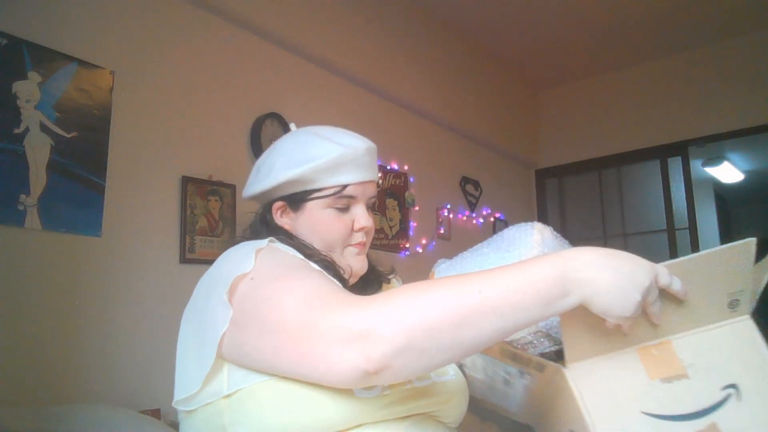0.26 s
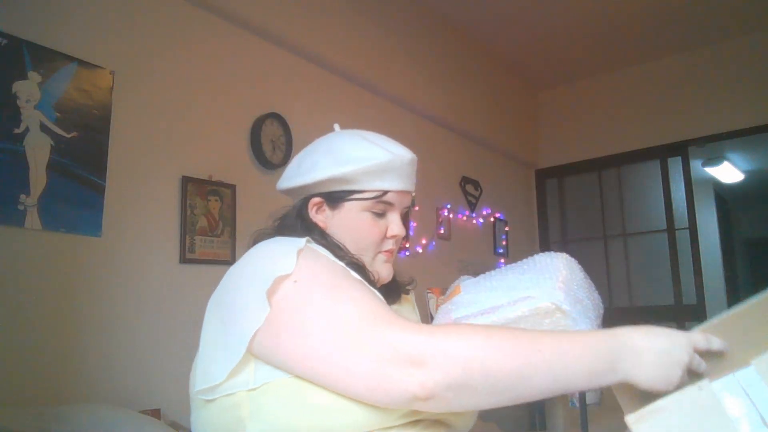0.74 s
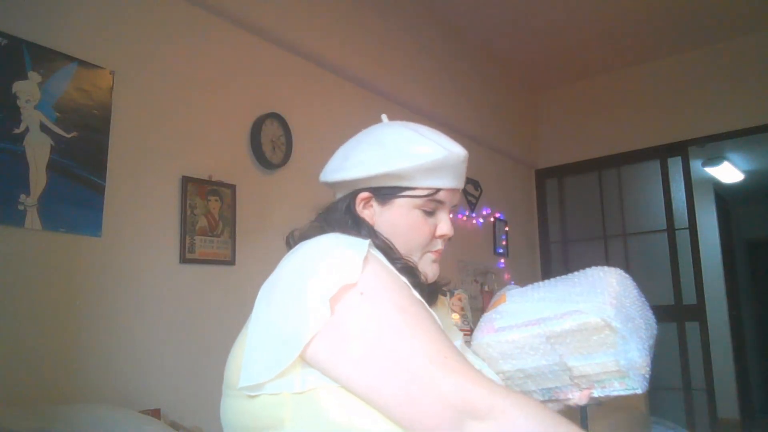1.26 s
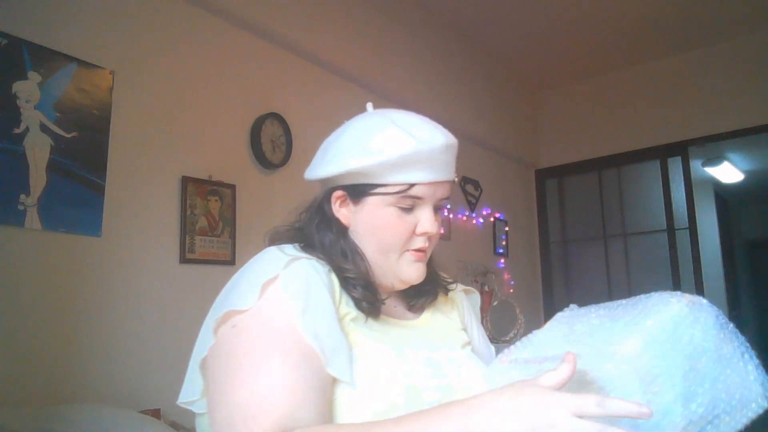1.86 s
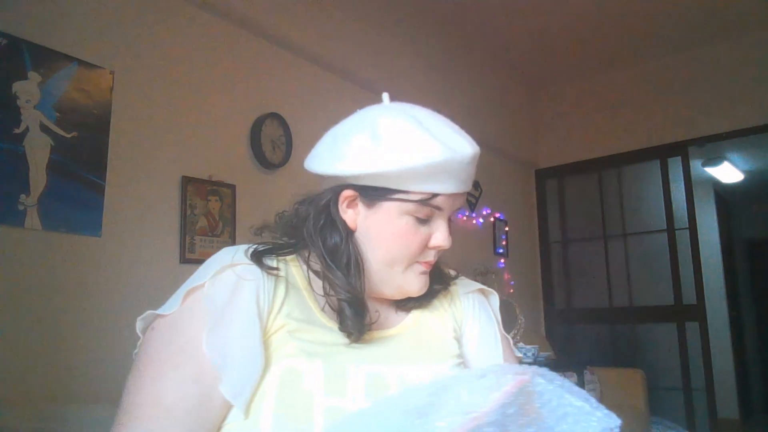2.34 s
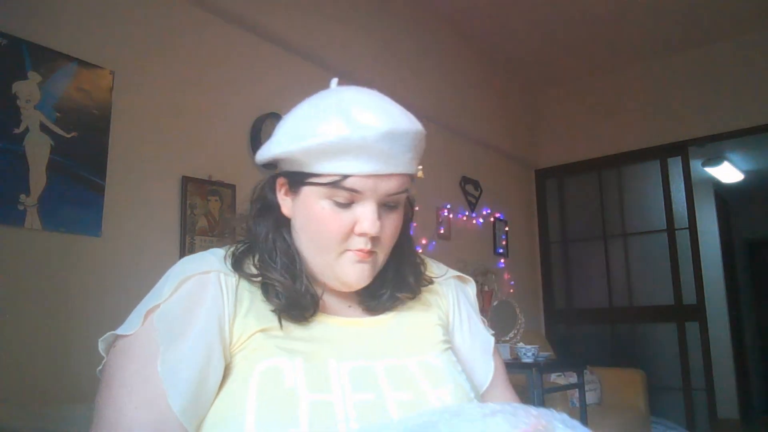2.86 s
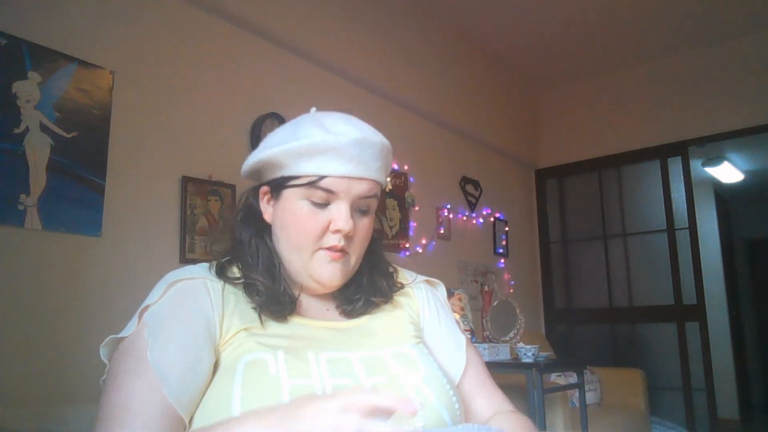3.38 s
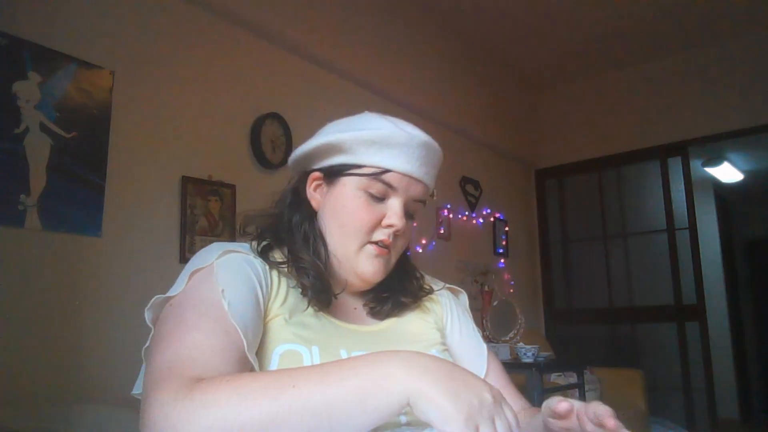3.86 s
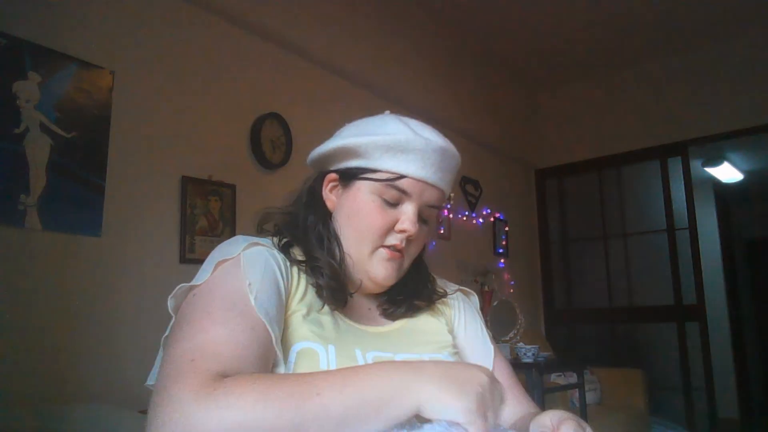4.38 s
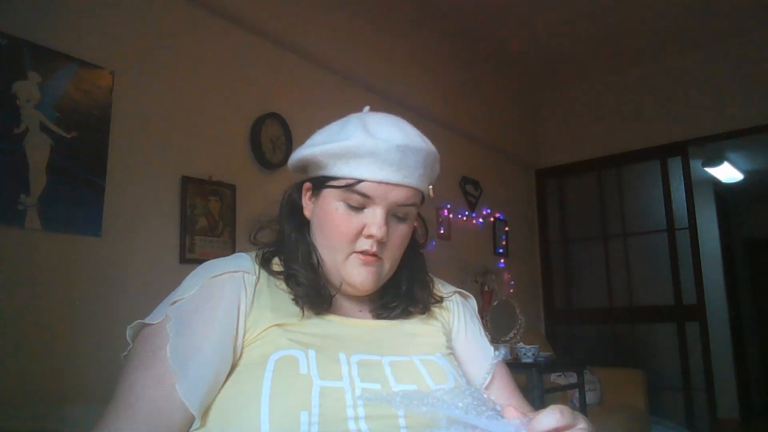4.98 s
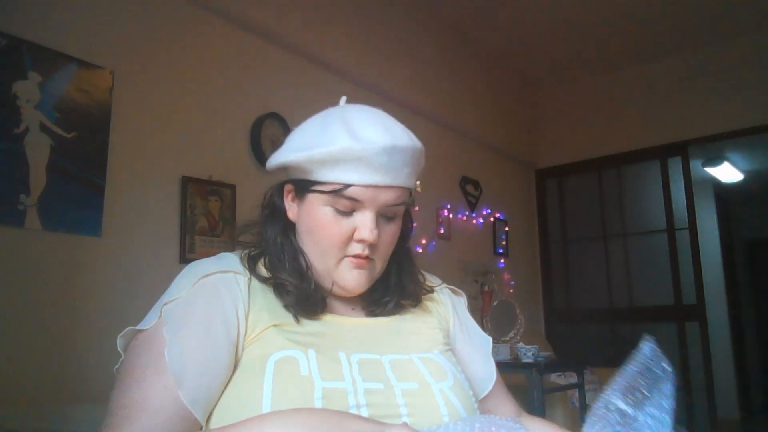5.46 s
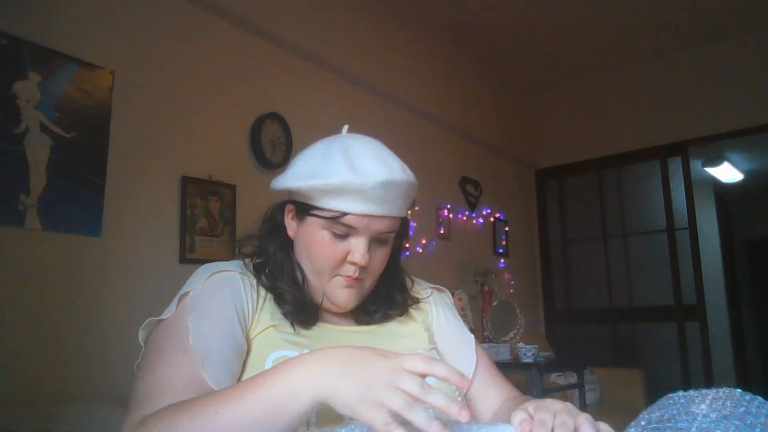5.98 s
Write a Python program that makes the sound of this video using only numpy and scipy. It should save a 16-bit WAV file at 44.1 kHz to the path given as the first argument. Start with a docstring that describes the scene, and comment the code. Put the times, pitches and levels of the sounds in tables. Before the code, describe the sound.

A low, swelling room hum with faint hiss opens the scene, with barely audible plastic crackles at 0.1 and 0.3 s. Around 0.9 s a cardboard box brushes an edge faintly, then from 1.2 to 1.5 s lands with a loud, dull, hollow thump, bouncing in quick low knocks with papery flap rattle. Quiet follows, with slight crinkles near 1.6 s. At 2.1 s bubble wrap bursts into bright crackle and snaps, continuing strongly around 2.4 s and in smaller grabs until about 3.2 s. After a lull, crinkling returns at 3.5-3.9 s. The loudest flurry comes at 4.2-4.5 s, dense sharp snaps with short popping cells and a soft boxy knock, then another pop and crackle near 4.8 s. Light rustling continues from 5 s, with a brisk burst at 5.7 s fading into soft crinkles by 6.2 s. A thin, high whine wavers faintly; the room tail is short.

```python
"""Over a low room hum, film first crackles faintly; then a cardboard box is put down with a dull, bouncing thump.
Hands turn and unwrap a parcel in bubble wrap: countless tiny buckles, a few loud snaps, ringing air cells.
Buckles are short decaying cosines, snaps are filtered clicks, and the box is a sum of decaying panel modes.
A short reverberant tail follows both; shaped noise makes hum and hiss, a wavering sine makes a thin whine."""
import sys
import numpy as np
from scipy import signal
from scipy.fft import rfft, irfft, next_fast_len
from scipy.io import wavfile
from scipy.ndimage import uniform_filter1d, map_coordinates

SR = 44100
rng = np.random.default_rng(int(sys.argv[2]) if len(sys.argv) > 2 else 0)


def materialize(psi):
    """Save the field psi as 16-bit PCM at rate SR to the path in sys.argv[1].

    A 1-D psi becomes a single channel; in a 2-D psi each row is a channel.
    """
    bounded = np.clip(np.atleast_2d(psi).T, -1, 1)
    quanta = np.round(bounded * 32767).astype(np.int16)
    wavfile.write(sys.argv[1], SR, quanta)


N = 274434


def amp(db):
    """Decibel law: the amplitude gain of a level in dB."""
    return 10 ** (np.asarray(db) / 20)


def unit(x):
    """Normalisation by mean power: x at rms 1."""
    return x / np.sqrt(np.mean(x ** 2) + 1e-20)


def along(points, hz):
    """Interpolation of (frequency, value) points on a logarithmic frequency axis."""
    f, v = np.transpose(points)
    return np.interp(np.log(hz + 1), np.log(f + 1), v)


def level_curve(rows):
    """Linear interpolation of (time, level) rows to one level per sample."""
    s, level_db = np.transpose(rows)
    return np.interp(np.arange(N) / SR, s, level_db)


def wobble(rate):
    """Slow random modulation: a smooth curve through `rate` random knots a second."""
    knots = rng.standard_normal(int(N * rate / SR) + 4)
    return map_coordinates(knots, [np.arange(N) * rate / SR])


def filtered(x, response):
    """Linear filtering: the spectrum of x times a complex response of frequency."""
    m = next_fast_len(N + SR // 2)
    return irfft(rfft(x, m) * response(np.fft.rfftfreq(m, 1 / SR)), m)[:N]


def plain(points):
    """Zero-phase response with the given (frequency, level) shape."""
    return lambda hz: amp(along(points, hz))


def causal(points):
    """Minimum-phase response: folding the cepstrum puts all ringing after its cause."""
    def response(hz):
        cepstrum = irfft(np.log(amp(along(points, hz))))
        half = len(cepstrum) // 2
        cepstrum[1:half] *= 2
        cepstrum[half + 1:] = 0
        return np.exp(rfft(cepstrum))
    return response


def low_cut(corner_hz):
    """Second-order high-pass response: two equal first-order sections in series."""
    return lambda hz: (1j * hz / (corner_hz + 1j * hz)) ** 2


def patchy(depth_db):
    """Modulated noise: white noise with patches of random gain in time and frequency."""
    z = signal.stft(rng.standard_normal(N + 512), nperseg=512)[2]
    field = uniform_filter1d(rng.standard_normal(z.shape), size=5, axis=0)
    field = uniform_filter1d(field, size=6, axis=1)
    return unit(signal.istft(z * amp(depth_db * unit(field)), nperseg=512)[1][:N])


def buckles(count, spread_db, clump_db, cycles):
    """Crackling noise: creases flip in clumps, most weak and few strong, each a short ring of its own pitch."""
    place, size, pitch, turn = rng.random((count, 4)).T[:, :, None]
    busy = np.cumsum(amp(clump_db * wobble(70)))
    start = np.interp(place, busy / busy[-1], np.arange(N)).astype(int)
    hz = 700 * 24 ** pitch
    t = np.arange(96) / SR
    size_db = -spread_db * np.log(size + .03)  # the offset bounds the strongest buckles
    decay_db = -60 * t * hz / cycles
    grains = hz * amp(size_db + decay_db) * np.cos(2 * np.pi * (hz * t + turn))
    where = start + np.arange(len(t))
    return unit(np.bincount(where.ravel(), grains.ravel(), N + len(t))[:N])


def handling():
    """Power addition of efforts on film, parcel body and finest creases: resting hands, slow pulls, sudden grabs."""
    # hands resting and shifting on the wrap:
    # (time [s], film effort [dB], parcel body [dB re film])
    holding = [(0, -64, 3), (.6, -71, 0), (1.2, -65, -3), (1.9, -61, -4), (2.07, -53, -9), (2.25, -41, -16),
               (2.83, -41, -10), (3.05, -47.5, -9), (3.35, -56, -12), (3.52, -53, -12), (3.68, -34, -18),
               (4.08, -36, -18), (4.21, -42, -11), (4.6, -43, -11), (4.74, -38, -11), (4.95, -47, -8),
               (5.5, -49, -8), (5.62, -45, -9), (5.9, -48, -8), (6.22, -48, -6)]
    # slow pulls: (time at full strength [s], film effort [dB], time to rise 20 dB, sign ignored [s],
    # hold [s], t60 [s], parcel body [dB re film], finest creases [dB re film])
    pulls = [(0.713, -56.5, 0.23, .01, .4, -10, -10), (1.564, -55, 0, .04, .3, 0.5, -7),
             (1.711, -43.5, 0.13, .004, .1, -4.5, -5), (2.13, -29.5, 0.0865, .02, .3, -18.5, -6),
             (2.374, -29, 0.09, .17, .5, -19.5, -6.5), (3.51, -45, .01, .02, .3, -15, -4),
             (3.56, -32, .025, .06, .5, -15, -4), (3.64, -29, 0.2, .02, .3, -39, -5.5),
             (4.28, -19.5, 0.06, 0.012, .7, -9, -9.5), (4.418, -26, 0.194, .01, .35, -3.5, -7),
             (4.508, -32, 0.65, .01, .3, -29, -10), (4.807, -27, .09, .025, .35, -6, -6.5),
             (5.347, -39, -0.08, .03, .3, -10, -19), (5.098, -41.5, 0.14, .07, .3, -5, -7),
             (5.236, -41, 0.18, .05, .5, -9.5, -9.5), (5.425, -41, 0.5, .02, .3, -6, -12),
             (5.72, -22.5, .035, .008, .15, -11, -18), (5.79, -35, .05, .03, .2, -9, -10),
             (5.999, -40, 0.28, .06, .5, -4, -13)]
    # grabs that set many creases off at once: (time [s], film effort [dB], hold [s], t60 [s],
    # parcel body [dB re film], finest creases [dB re film])
    grabs = [(.066, -58, .003, .1, -2, -12), (.096, -48, .02, .5, -4.5, -12), (.298, -53, .005, .3, -4, -9),
             (2.088, -32, .02, .3, -17, -5), (2.682, -34, .004, .1, -15, -8),
             (2.887, -33, .005, .2, -13, -9), (2.942, -33, .004, .14, -12, -10),
             (3.066, -33, .02, .6, -11, -9), (3.411, -45, .005, .25, -14, -10),
             (3.772, -31, .003, .09, -14, -8), (4.76, -32, .004, .12, -14, -7),
             (4.994, -41, .01, .3, -9, -5), (5.702, -26, .012, .18, -10, -8)]
    holding_fine_db, grab_rise_s = -8.5, .001  # finest creases re film; time to rise 20 dB

    t = np.arange(0, N, 16) / SR
    s, film_db, body_db = np.transpose(holding)
    film_db, body_db = np.interp(t, s, film_db), np.interp(t, s, body_db)
    power = amp(film_db + np.array([0 * t, body_db, holding_fine_db + 0 * t])) ** 2
    sudden = [(s, db, grab_rise_s, *rest) for s, db, *rest in grabs]
    for s, db, rise, hold, t60, *rel_db in pulls + sudden:
        rise_db = np.minimum(20 * (t - s) / abs(rise), 0)
        fall_db = -60 * np.maximum(t - s - hold, 0) / abs(t60)
        envelope = amp(np.maximum(db + rise_db + fall_db, -200))
        power += np.outer(amp([0, *rel_db]), envelope) ** 2
    return np.array([np.interp(np.arange(N) / SR, t, np.sqrt(p)) for p in power])


def snaps(effort, count):
    """Sudden release of stored strain: set loud snaps, and lesser ones that scatter with the effort of the hands."""
    # single buckles that stand out: (time [s], film click before a 6 dB cut [dB],
    # parcel body [dB re film click], finest creases [dB re film click])
    loud = [(.301, -39, -9, -13), (2.0895, -26, -3, -3), (2.104, -16, -23, -15), (2.129, -4.5, -23, -14),
            (1.59, -36, -14, -8), (1.7, -33, -14, -6), (2.2709, -22.5, -14, -0.5),
            (2.3773, -8.5, -24, -14.5), (2.39, -9, -31, -15), (2.482, -10, -23, -17),
            (2.6828, -17, -32, -5), (2.6905, -17, -25, -4), (2.8127, -21, -19, -5), (2.894, -19, -6, -9),
            (2.901, -21, -18, -19), (2.9417, -16, -39, -4), (3.0206, -27, -28, -2.5),
            (3.065, -12.5, -19.5, -21), (3.0735, -21, -23, 0), (3.087, -14.5, -27, -2),
            (3.4108, -26, -17.5, -31), (3.4708, -26, -24, -2), (3.5554, -26, -12, -6),
            (3.5797, -14, -38, -4.5), (3.7747, -15, -6, -12), (3.8362, -9.5, -15, 1.5),
            (4.2061, -18.5, -31.5, -25), (4.2661, -7, -31, -24), (4.2742, -3.5, -8.5, -30),
            (4.3327, -7, -18, -16), (4.346, -12, -13, -13), (4.359, 0, -15, -5), (4.3923, -5, -27, -9),
            (4.4021, -2, -9.5, -16), (4.4152, -5, -17, -23), (4.459, -20, -22, -19),
            (4.6376, -18.5, -16, 1), (4.7601, -7, -20, -3), (4.807, -9.5, -12, 1), (5.6795, -23, -26, -15),
            (5.768, -23, -1, -16), (5.7866, -16, -16, -9)]
    stray_db, stray_spread_db = 3.5, 2.5  # lesser snaps: click level over the film effort, scatter
    stray_body_db, stray_fine_db, stray_colour_db = -19.5, -21, 5.5  # re film click; scatter of both

    luck = rng.standard_normal((count, 3))
    busy = np.cumsum(np.sqrt(effort))
    at = np.interp(rng.random(count), busy / busy[-1], np.arange(N)).astype(int)
    stray = [at / SR,
             effort[at] * amp(stray_db + stray_spread_db * luck[:, 0]),
             stray_body_db + stray_colour_db * luck[:, 1],
             stray_fine_db + stray_colour_db * luck[:, 2]]
    s, peak_db, body_db, fine_db = np.transpose(loud)
    return np.hstack([[s, amp(peak_db - 6.0), body_db, fine_db], stray])


def wrap():
    """Source and filter: buckles, snaps and sliding excite the film, the parcel body and the finest creases."""
    # colour of the film: (frequency [Hz], relative level [dB])
    film_shape = [(1500, -80), (2400, -16), (3500, -2.5), (4700, -2), (6200, 2.5), (7400, -1), (8600, -10),
                  (10500, -37.5)]
    # colour of the finest creases: (frequency [Hz], relative level [dB])
    fine_shape = [(7000, -30.5), (9000, 4), (11500, 0.5), (14000, 2), (15500, 0), (20000, -1.5)]
    # resonances of the parcel under the film: (frequency [Hz], width [Hz], relative level [dB])
    body_modes = [(434, 170, -4), (1100, 214, 1), (1730, 430, 2.5), (2445, 1830, -3.5)]

    def parcel(hz):
        """Resonance: parallel band-pass modes of alternating sign."""
        total = 0
        for k, (centre, width, db) in enumerate(body_modes):
            damping = 1j * hz * width
            total = total + (-1) ** k * amp(db) * damping / (centre ** 2 - hz ** 2 + damping)
        return total

    crackle = buckles(count=36000, spread_db=4.2, clump_db=3, cycles=4)
    film, body, fine = handling() * amp(1.63 * wobble(24))  # the grip shifts many times a second
    s, peak, snap_body_db, snap_fine_db = snaps(film, count=320)
    burst = np.arange(200) / SR
    # the crease frays after it jumps
    click = rng.standard_normal((len(s), len(burst))) * 0.16 * amp(-60 * burst / 0.0071)
    click[:, 0] = 1
    where = (np.round(s * SR).astype(int)[:, None] + np.arange(len(burst))).ravel()
    impulse = (np.arange(N) == 0).astype(float)

    out = np.zeros(N)
    # (response, effort, share of buckles, snap level [dB])
    layers = [(causal(film_shape), film, .85, 0),
              (parcel, body, .6, snap_body_db),
              (causal(fine_shape), fine, .65, snap_fine_db)]
    for colour, effort, grain, snap_db in layers:
        sliding = patchy(depth_db=4.5)
        drive = grain * crackle + np.sqrt(1 - grain ** 2) * sliding
        out += amp(-4.0 + 1.06 * wobble(11)) * effort * unit(filtered(drive, colour))
        height = np.abs(filtered(impulse, colour)).max()  # peak of a unit impulse in this colour
        clicks = (peak * amp(snap_db))[:, None] * click
        train = np.bincount(where, clicks.ravel(), N + len(burst))[:N]
        out += filtered(train, colour) / height
    return out


def pops():
    """Damped oscillation: each air cell gives way and rings briefly at its own pitch."""
    # (time [s], frequency [Hz], level before onset and decay [dB], t60 [s])
    cells = [(2.847, 830, -28.5, 0.03), (3.626, 1100, -43, 0.25), (4.281, 915, -17, 0.012),
             (4.416, 1130, -21.5, 0.02), (4.502, 1070, -27.5, 0.03), (4.527, 1065, -24.5, 0.017),
             (4.823, 1044, -30, 0.068), (4.833, 1330, -14.5, 0.018), (5.72, 1074, -38, 0.14)]
    out, t = np.zeros(N + SR), np.arange(SR // 4) / SR
    for s, hz, db, t60 in cells:
        envelope = amp(db - 60 * t / t60) * (1 - np.exp(-t / 0.001))
        out[round(s * SR):][:len(t)] += envelope * np.sin(2 * np.pi * hz * t)
    return out[:N]


def box():
    """Modal synthesis: every contact rings the panels of a carton and shakes its loose flaps."""
    # contacts of the box with furniture and floor: (time [s], big-panel thump [dB],
    # frequency pushed most [Hz], small-panel knock [dB], flap rattle [dB])
    blows = [(0.857, -66, 150, -57, -61), (0.921, -33, 149, -70, -54), (.995, -30, 150, -56, -68),
             (1.025, -20, 159, -63, -77), (1.222, -1.5, 226, -16.5, -29.5), (1.232, -7.5, 244, -28, -28),
             (1.245, 5.5, 146, -14, -20.5), (1.266, -3, 100, -14.5, -48), (1.284, -7, 204, -18.5, -42),
             (1.307, -1.5, 153, -21, -41), (1.334, -15, 230, -22.5, -54), (1.372, -4, 98, -21.5, -33),
             (1.411, -2.5, 146, -46, -42), (1.447, -18, 119, -42, -53), (1.494, -11.5, 140, -48, -50.5)]
    # knocks on the parcel, a like carton damped by lap and wrap: columns as for the blows
    knocks = [(2.847, -40, 110, -37.5, -47), (4.39, -20.5, 180, -31, -63), (4.835, -17.5, 170, -45, -66),
              (5.711, -44, 152, -42, -43)]
    # panel modes: (frequency [Hz], relative level [dB], undamped t60 [s], 0 big or 1 small panel)
    panel_modes = [(97, 0, .2, 0), (146, 0, .13, 0), (208, 0, .12, 0), (262, 0, .12, 0), (315, 0, .1, 0),
                   (376, 2, .14, 1), (445, -1, .1, 1), (510, -5, .08, 1), (600, -8, .08, 1),
                   (660, -9, .08, 1), (735, -10, .08, 1), (850, -12, .07, 1), (940, -11, .07, 1),
                   (1090, -12, .06, 1), (1300, -13, .05, 1), (1600, -13, .06, 1)]
    # colour of the loose flaps: (frequency [Hz], relative level [dB])
    flap_shape = [(500, -6.5), (1000, 4.5), (2000, -6), (3000, -10), (5000, -9.5), (7500, -14.5),
                  (10000, -26.5), (14000, -23), (20000, -28.5)]
    held = .45  # share of the ring time left in a held carton
    reach_db = 25  # a big panel one octave from the push gets this much less

    panels, flaps, t = np.zeros(N + SR), np.zeros(N + SR), np.arange(SR // 2) / SR
    hz, level_db, t60, small = np.transpose(panel_modes)[:, :, None]
    small = small > .5
    contacts = [(*b, 1) for b in blows] + [(*k, held) for k in knocks]
    for s, thump_db, push_hz, knock_db, rattle_db, free in contacts:
        start = round(s * SR)
        luck_db, bend = rng.standard_normal((2, *hz.shape)) * small  # small panels flex and detune
        big_db = thump_db - reach_db * np.abs(np.log2(hz / push_hz))
        strength_db = np.where(small, knock_db, big_db)
        clock = t + start / SR * ~small  # the big panels bounce in step with their own swing
        slip = .7 * rng.standard_normal(hz.shape)  # never quite in step [rad]
        decay = amp(strength_db + level_db + 2.5 * luck_db - 60 * t / (free * t60))
        rise = 1 - np.exp(-t * hz / .8)  # a soft contact takes most of a cycle
        swing = np.sin(2 * np.pi * hz * (1 + 0.05 * bend) * clock + slip)
        panels[start:][:len(t)] += np.sum(decay * rise * swing, axis=0)
        shake = amp(-60 * t / 0.18) + 0.45 * amp(-60 * t / 0.0015)
        flaps[start:][:len(t)] += amp(rattle_db) * shake
    rattle = unit(filtered(patchy(depth_db=2.5), causal(flap_shape)))
    return panels[:N] + flaps[:N] * rattle


def scrape():
    """Friction noise: the box scrapes along an edge on its way down."""
    # (frequency [Hz], relative level [dB])
    edge_shape = [(300, -28), (700, 4.5), (1000, -1), (1700, -2), (2200, -12), (6000, -8), (16000, -24)]
    start_s, end_s, level_db = .855, 1.115, -60
    clock = np.arange(N) / SR
    fade = np.clip(np.minimum((clock - start_s) / .004, (end_s - clock) / .015), 0, 1)
    drag = fade * amp(level_db + 1.8 * wobble(30))
    return drag * unit(filtered(patchy(depth_db=3.5), plain(edge_shape)))


def room(x):
    """Reverberation: diffuse noise whose frequencies each die at their own speed."""
    # (frequency [Hz], t60 [s])
    decay_times = [(250, 0.53), (500, 0.42), (2000, 0.26), (8000, 0.27), (16000, 0.18)]
    hz, t, z = signal.stft(rng.standard_normal(SR // 2), SR, nperseg=256)
    decay = amp(-60 * t / along(decay_times, hz)[:, None])
    tail = signal.istft(z * decay, SR, nperseg=256)[1]
    delayed = np.pad(x, (150, 0))  # samples
    return signal.fftconvolve(delayed, tail / np.linalg.norm(tail))[:N]


def background():
    """Noise and tone: a low swelling rumble, faint hiss and a thin frequency-modulated whine whose level comes
    and goes."""
    # colour of the hum: (frequency [Hz], relative level [dB])
    hum_shape = [(18, -40), (30, -56), (77, -3), (124, 4), (210, 0.5), (470, -21.5), (1000, -49)]
    # mean level of room hum and bumps through the furniture: (time [s], level [dB])
    rumble_levels = [(0, -42), (.134, -45), (.5, -54), (1.07, -46.5), (1.3, -45), (2.3, -53.5), (2.84, -55),
                     (3.43, -51.5), (3.75, -56.5), (5.0, -48.5), (5.3, -53), (6.22, -50.5)]
    # colour of the hiss: (frequency [Hz], relative level [dB])
    hiss_shape = [(250, 3), (470, 4.5), (1040, 4), (2700, -23), (5500, -26.5), (11400, -38), (14800, -14),
                  (20000, -14)]
    # mean level of the whine: (time [s], level [dB])
    whine_levels = [(0, -64), (1.65, -65), (1.8, -54.5), (2.05, -75), (2.2, -47.5), (2.7, -63), (2.97, -44),
                    (3.2, -75), (3.4, -55.5), (4.2, -50.5), (4.6, -70), (6.22, -70.5)]

    hum = unit(filtered(patchy(depth_db=1.5), plain(hum_shape)))
    hum *= amp(level_curve(rumble_levels) + 1.8 * wobble(6))
    hiss = unit(filtered(patchy(depth_db=6.5), plain(hiss_shape))) * amp(-61.5)
    phase = 2 * np.pi * np.cumsum(4324 + 4 * wobble(9)) / SR
    whine = amp(level_curve(whine_levels) + 2.2 * wobble(16)) * np.sin(phase)
    return hum + hiss + whine


def scene():
    """Superposition: wrap and box, the room's answer to both, and the background."""
    film = wrap() + pops()
    carton = box() + scrape()
    upper = filtered(carton, low_cut(300))  # the room answers only the carton's upper range
    answer = room(amp(-12) * film + amp(-7.5) * upper)
    return (film + carton + answer + background())[None]


def record(dry):
    """Band limiting and saturation: a small microphone loses deep bass and rounds off the loudest swings."""
    corner_hz, ceiling, top_hz = 70, .85, 15950  # ceiling is an amplitude
    sensed = filtered(dry[0], low_cut(corner_hz))
    rounded = sensed / (1 + np.abs(sensed / ceiling) ** 4) ** (1 / 4)
    return filtered(rounded, lambda hz: hz < top_hz)[None]


dry = scene()
out = record(dry)
materialize(out)
```